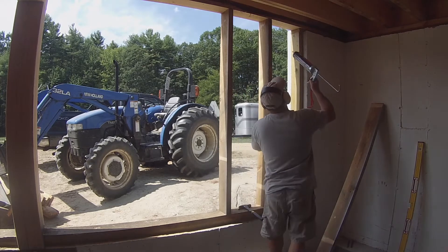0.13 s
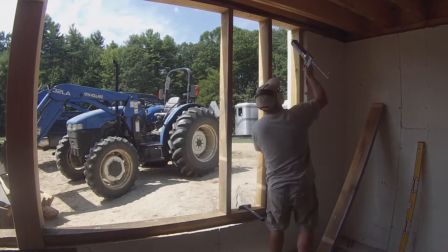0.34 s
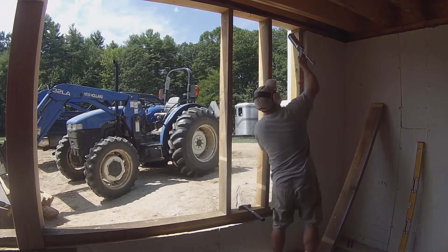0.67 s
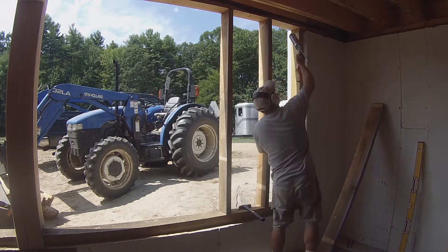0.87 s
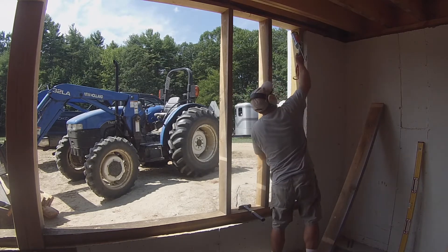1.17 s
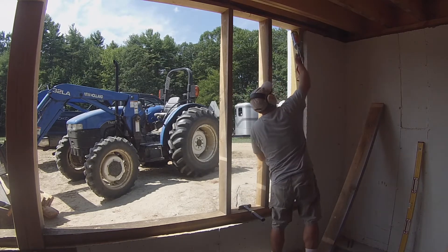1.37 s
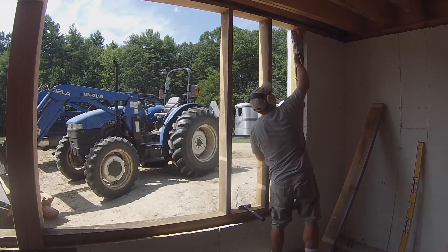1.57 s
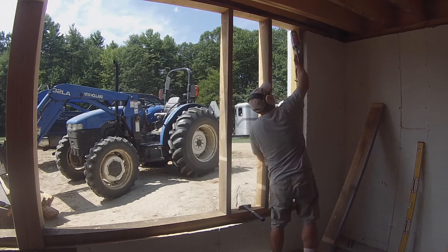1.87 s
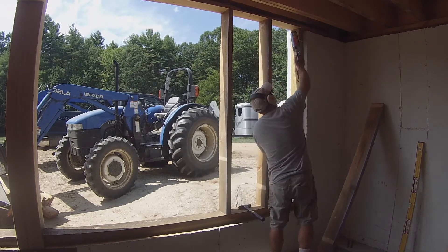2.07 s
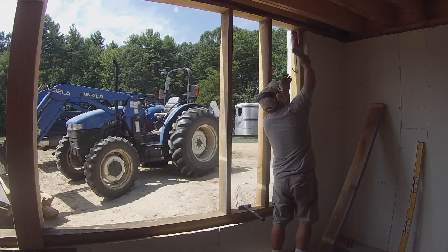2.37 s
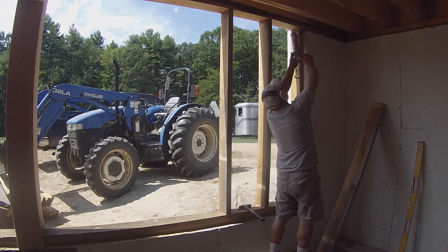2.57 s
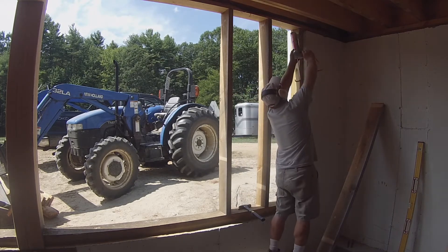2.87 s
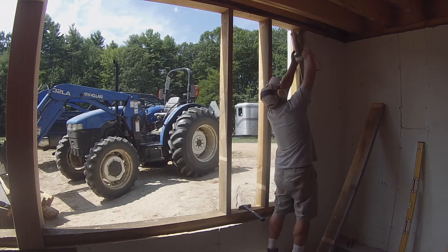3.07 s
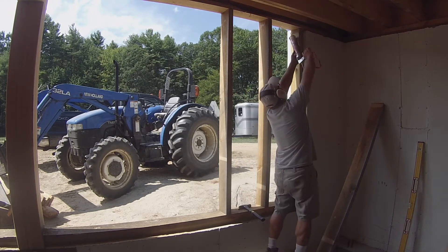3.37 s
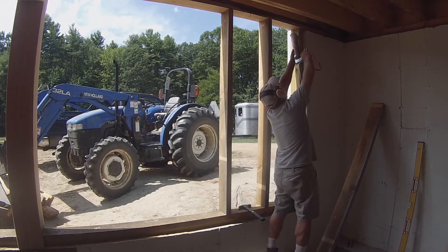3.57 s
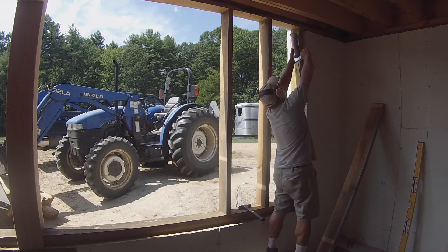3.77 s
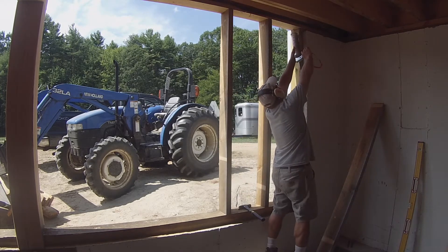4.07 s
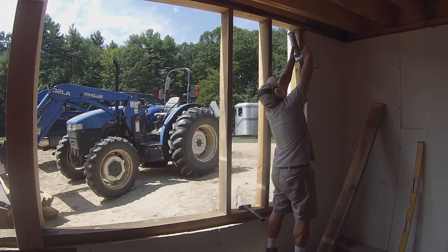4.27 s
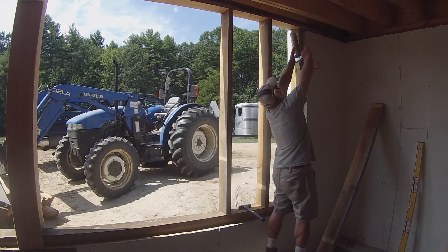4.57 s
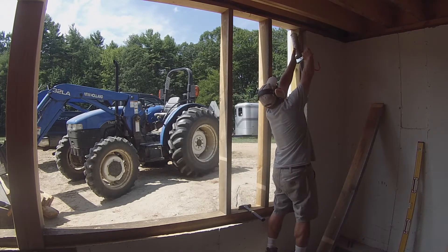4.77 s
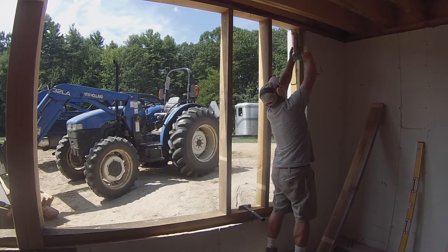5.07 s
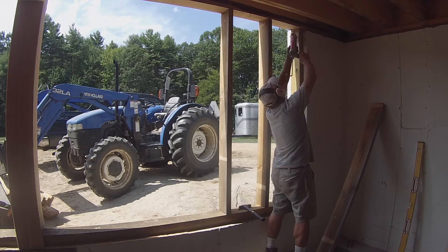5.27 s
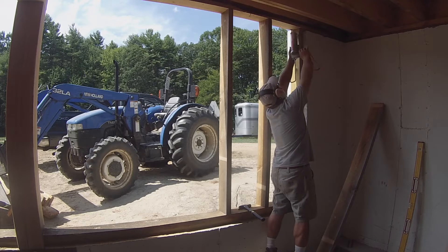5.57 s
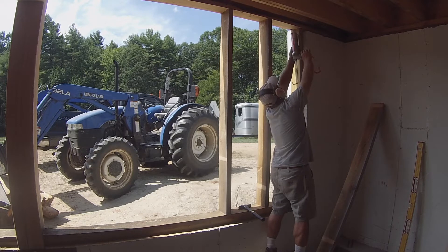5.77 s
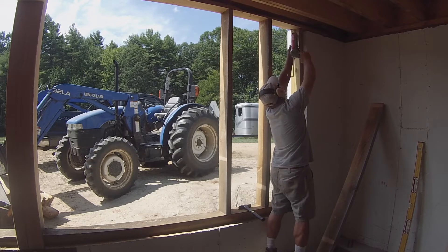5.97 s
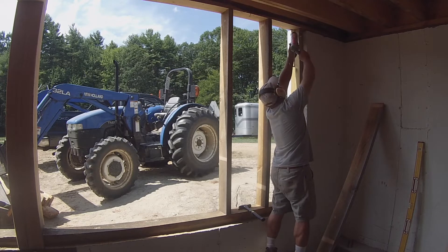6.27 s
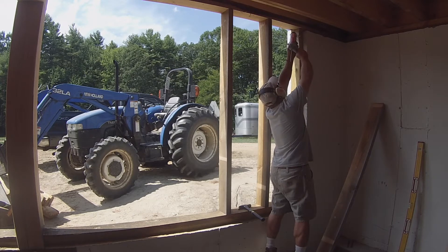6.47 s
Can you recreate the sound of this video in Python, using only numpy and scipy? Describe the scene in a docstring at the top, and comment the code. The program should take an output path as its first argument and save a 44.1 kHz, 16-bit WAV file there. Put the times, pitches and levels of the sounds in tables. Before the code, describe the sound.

The first 0.6 s is fully silent. Then quiet outdoor air enters abruptly, soft hiss and low rumble, with faint high ticks scattered to the end. At 0.87-0.97 s a tight burst of heavy, dull, hollow timber knocks is the loudest event, its hum dying after 1.1 s; a lighter knock follows at 1.44. A crisp steel caulking-gun click snaps at 1.98 s. Faint wood creaks appear around 2.4 and 2.9-3.05 s, with a brief fluttering cloth rub near 2.9-3.1 and small contacts at 3.4 and 3.7. Strong trigger clicks return at 3.92, 4.92 and 5.64 s, bright and metallic with a hollow tube ring beneath; dull knocks fall at 4.16, 5.06 and 6.14. Air alone remains to about 6.6 s. Contacts sound close to one microphone, each followed by a short wash from bare block walls.

```python
"""After a short silence, outdoor air rumbles and hisses through the open wall of a bare house shell, with
faint high ticks. Close by, a steel caulking gun clicks as its trigger is pumped, its tube ringing hollow
under the loud clicks; timber knocks and creaks and cloth rubs. Contacts ring resonant modes, and block
walls turn each into a short wash; creaks are unsteady tones in the same kind of wash; air, cloth, ticks
and the heavy knock's dying tail are shaped noise. All reach one microphone."""
import sys
import numpy as np
from scipy import signal
from scipy.fft import rfft, irfft, next_fast_len
from scipy.io import wavfile
from scipy.ndimage import uniform_filter1d, map_coordinates

SR = 44100
rng = np.random.default_rng(int(sys.argv[2]) if len(sys.argv) > 2 else 0)


def bounce(signal):
    """Save signal as a 16-bit WAV file at the path given by the first command-line argument."""
    frames = np.transpose(np.atleast_2d(signal))
    limited = np.clip(frames, -1, 1)
    pcm = np.round(limited * 32767).astype(np.int16)
    wavfile.write(sys.argv[1], SR, pcm)


N = 292383
TAIL = 2 ** 16  # length of a room answer [samples]


def amp(db):
    """Gain of a level in dB."""
    return 10 ** (np.asarray(db) / 20)


def unit(x):
    """x scaled to rms 1."""
    return x / np.sqrt(np.mean(x ** 2) + 1e-20)


def along(points, hz):
    """Points of (frequency [Hz], value) read on a log frequency axis."""
    point_hz, value = np.transpose(points)
    return np.interp(np.log(hz + 1), np.log(point_hz + 1), value)


def curves(rows):
    """One value per sample for each column after the time [s]."""
    s, *columns = np.transpose(rows)
    return [np.interp(np.arange(N) / SR, s, column) for column in columns]


def wobble(rate):
    """A smooth random curve through `rate` random knots a second."""
    knots = rng.standard_normal(int(N * rate / SR) + 4)
    return map_coordinates(knots, [np.arange(N) * rate / SR])


def filtered(x, response):
    """x with its spectrum multiplied by a response of frequency."""
    m = next_fast_len(len(x) + 8192)
    spectrum = rfft(x, m) * response(np.fft.rfftfreq(m, 1 / SR))
    return irfft(spectrum, m)[:len(x)]


def noise(spectrum):
    """Coloured noise of rms 1, all but silent below the first point of its spectrum."""
    def response(hz):
        return amp(np.where(hz > spectrum[0][0], along(spectrum, hz), -120))
    return unit(filtered(rng.standard_normal(N), response))


def walls(direct_db, rise):
    """Block walls: the direct path, then a wash that builds up over `rise` [s] and dies band by band."""
    # decay of the wash: (frequency [Hz], t60 [s])
    decay = [(100, 1.47), (500, 0.87), (1000, 0.72), (2300, 0.74), (4000, 0.61), (9000, 0.48),
             (14000, 0.28)]
    # extra strength of the first echoes: (frequency [Hz], level [dB])
    near_boost = [(150, 9), (700, 5), (1400, 8), (2500, -2), (10000, 0.5)]
    near_t60 = 0.14  # s
    hz, t, z = signal.stft(rng.standard_normal(TAIL), SR, nperseg=256)
    late = amp(-60 * t / along(decay, hz)[:, None])
    near = 1 + np.outer(amp(along(near_boost, hz)) - 1, amp(-60 * t / near_t60))
    # the first echoes arrive in bunches; later they merge into an even wash
    lumps = unit(uniform_filter1d(rng.standard_normal(len(t)), size=3))
    bunches = amp(3.0 * lumps * np.exp(-t / 0.048))
    wash = signal.istft(z * late * near * bunches, SR, nperseg=256)[1][:TAIL]
    wash = wash * (1 - np.exp(-np.arange(TAIL) / SR / max(rise, 1 / SR)))
    return np.concatenate([[amp(direct_db)], wash[1:]])


def blows(events, modes, contact_hz, rise, middle_hz, favour_octaves, scatter_db):
    """Contacts ring shared modes, tilted by sharpness and changed near the frequencies each one names."""
    out = np.zeros(N + TAIL)
    f = np.fft.rfftfreq(TAIL, 1 / SR)
    hz, usual_db, _ = np.transpose(modes)
    # two coupled resonances per mode give steep flanks; the root evens out energy over widths
    ring = np.array([(1j * f * w / (c * c - f * f + 1j * f * w)) ** 2 * np.sqrt(2 * SR / (np.pi * w))
                     for c, _, w in modes])
    # a soft contact drives little treble
    soft = 1 / (1 - (f / contact_hz) ** 2 + 1j * np.sqrt(2) * f / contact_hz)
    for s, db, direct_db, sharp_db, *places in events:
        place_db = 0
        for at_hz, change_db in zip(places[::2], places[1::2]):
            place_db = place_db + change_db * np.exp(-(np.log2(hz / at_hz) / favour_octaves) ** 2)
        tilt_db = sharp_db * np.log2(hz / middle_hz)
        strength_db = usual_db + tilt_db + place_db + scatter_db * rng.standard_normal(len(hz))
        heard = (amp(strength_db) @ ring) * soft * rfft(walls(direct_db, rise))
        out[round(s * SR):][:TAIL] += amp(db) * irfft(heard, TAIL)
    return out[:N]


def air_and_knock_tail():
    """Noise as hiss and low rumble of outdoor air, and a hollow hum, mostly the heavy knock's dying tail."""
    # spectra of hiss, hollow hum and rumble: (frequency [Hz], relative level [dB per Hz])
    hiss_spectrum = [(15, -36), (25, -3), (71, -3.5), (119, -6), (159, -10), (182, -6), (208, -6),
                     (479, -13), (736, -15.5), (1230, -18), (1330, -18.5), (3060, -21.5), (7020, -29.5),
                     (11100, -35), (15300, -40.5)]
    hum_spectrum = [(250, -41), (380, -3), (700, -0.5), (920, -9.5), (1050, -35)]
    rumble_spectrum = [(15, -5), (30, -11.5), (65, -6), (150, -4.5), (300, -40)]
    # low rumble of outdoor air, and a hollow hum that is mostly the heavy knock's dying tail around 1.06 s:
    # (time [s], rumble before wavering [dB], hum before wavering [dB])
    slow_levels = [(0.7, -77, -94), (0.78, -69, -70), (0.91, -60, -98), (1.06, -65, -43), (1.69, -70, -66),
                   (2.38, -67, -72), (2.55, -65.5, -64), (3.46, -68, -67), (4.08, -63, -63.5),
                   (4.28, -67, -69), (4.88, -69.5, -70.5), (5.23, -64, -67.5), (5.97, -67, -69),
                   (6.33, -67, -68.5), (6.63, -68, -75)]
    rumble_db, hum_db = curves(slow_levels)
    hiss = amp(-60 + 0.6 * wobble(3)) * noise(hiss_spectrum)
    rumble = amp(rumble_db + 0.6 * wobble(6)) * noise(rumble_spectrum)
    hum = amp(hum_db + 0.52 * wobble(8.8)) * noise(hum_spectrum + [(1300, -120)])
    return hiss + rumble + hum


def ticks():
    """Treble noise opened in puffs of a few milliseconds; the weak ones fall at random and waver in level."""
    # the clearest faint high ticks: (time [s], level [dB])
    clear_ticks = [(0.825, -70), (1.1804, -68), (1.2645, -71), (1.4576, -67), (2.363, -71), (2.428, -68),
                   (2.8274, -72), (3.1403, -74), (4.1624, -70), (4.2627, -70), (4.7321, -66.5),
                   (4.8344, -70), (5.4834, -71), (6.2654, -72), (6.3684, -73)]
    # colour of a tick: (frequency [Hz], relative level [dB per Hz])
    tick_spectrum = [(6500, -20), (8500, 0), (9800, 1), (10400, 8), (11300, 9), (11800, -2), (13500, -6),
                     (15000, -20)]
    weak_count, weak_db, spread_db = 160, -82, 1.5  # level before wavering, scatter
    gate = np.zeros(N)
    weak_gain = amp(weak_db + spread_db * rng.standard_normal(weak_count))
    gate[rng.integers(N, size=weak_count)] = weak_gain
    gate = gate * amp(2.2 * wobble(8))
    for s, db in clear_ticks:
        gate[round(s * SR)] = amp(db)
    puff = np.exp(-(np.arange(-600, 601) / SR / 0.004) ** 2)
    return signal.fftconvolve(gate, puff, "same") * noise(tick_spectrum)


def rustle():
    """Cloth and hands rub on the frame: fluttering noise, only while the arms move."""
    # rubbing: (time [s], level before flutter [dB])
    rubbing = [(2.3, -77), (2.384, -78), (2.778, -79), (2.89, -67), (2.898, -61), (3.036, -61.5),
               (3.088, -71), (3.156, -68), (3.3, -89), (3.35, -66)]
    # colour of the cloth: (frequency [Hz], relative level [dB per Hz])
    cloth_spectrum = [(530, -22.5), (900, 0), (1030, -5), (1470, -13), (1780, -2), (2930, -6), (12000, -28),
                      (15600, -60), (22000, -120)]
    start, end = rubbing[0][0], rubbing[-1][0]
    moving = np.interp(np.arange(N) / SR, [start - 0.1, start, end, end + 0.11], [0, 1, 1, 0])
    return moving * amp(curves(rubbing)[0] + 1.1 * wobble(67)) * noise(cloth_spectrum)


def creaks():
    """Strained wood sings narrow tones, unsteady in pitch and level, among the walls."""
    # faint creaks: (start [s], length [s], mean pitch [Hz], level before wavering [dB])
    creak_rows = [(2.359, 0.1, 440, -61), (2.396, 0.23, 807, -64), (2.92, 0.062, 1010, -64.5),
                  (2.925, 0.135, 831, -62.5), (2.98, 0.055, 651, -61)]
    t, out = np.arange(N) / SR, np.zeros(N)
    for s, length, hz, db in creak_rows:
        swell = np.clip(np.minimum(t - s, s + length - t) / 0.014, 0, 1)
        level = amp(db + 3.2 * wobble(29.88))
        phase = 2 * np.pi * hz * np.cumsum(1 + 0.01546 * wobble(25)) / SR
        out += level * swell * np.sin(phase)
    room = walls(46.0, rise=0.01)
    return signal.fftconvolve(out, room / np.linalg.norm(room))[:N]


def timber_and_tube():
    """Low modes: dull knocks of studs and boards, and the gun's tube near 690 Hz under the loud clicks."""
    # studs, boards and the gun's tube: (frequency [Hz], usual strength [dB], width [Hz])
    low_modes = [(70, -25, 87), (144, -14.5, 87), (259, -13.5, 67), (367.4, -9, 92), (463, -6, 90),
                 (594, -4.5, 81), (693, -8.5, 104), (805, -9.5, 54), (890, -10, 40), (1085, -19, 90),
                 (1360, -25.5, 82)]
    # dull knocks of studs and boards, and the hollow ring of the gun's tube under the loud clicks:
    # (time [s], relative level [dB], direct path gain against the wash [dB],
    # sharpness [dB per octave], then pairs of modes favoured or damped: frequency [Hz], change [dB])
    knocks = [(0.63, -59.5, 21, -2.5, 700, 1.8, 70, -12), (0.868, -44.5, 26, -3, 590, 7, 805, -14),
              (0.888, -34.5, 30.5, -1.5, 706, 5.3, 465, 2.5), (0.914, -41, 25, 3, 400, 6, 895, 3),
              (0.947, -26.5, 28.5, 0.3, 900, 4.2, 700, -7, 400, 4),
              (0.965, -29, 30.7, 1, 810, 3, 410, 9, 200, -8), (1.069, -46, 32.5, 0, 594, 12.6, 255, -14),
              (1.129, -47, 26, 3, 500, 16, 695, -12), (1.439, -51, 28.8, 6.5, 740, 8.2, 370, -6),
              (1.992, -70.5, 36.72, -0.5, 707, 19.3, 465, 2), (3.347, -72, 22.22, 4, 594, 5, 255, -8),
              (3.393, -64.5, 31.32, 4, 614, 4.4, 252, -12), (3.686, -63.5, 34.56, 4, 835, 10.2, 594, 4),
              (3.843, -63, 31, 5, 740, 15, 465, -10), (3.921, -67, 31.48, 12, 648, 18, 805, 3),
              (4.115, -65.5, 28.08, 6, 695, 11.3, 895, 2.5), (4.156, -63.5, 37, -4.5, 614, 12, 805, -12),
              (4.93, -69, 31.48, 12, 695, 16, 594, 4), (5.063, -50, 38, -2, 740, 9.9, 367, 4, 500, -5),
              (5.641, -62, 36.72, 5, 700, 15, 594, 3.5), (6.1385, -55, 35.7, -3, 370, 5.3, 255, 4),
              (6.283, -79, 36.72, 3, 695, 17, 465, -1)]
    return blows(knocks, low_modes, contact_hz=1240, rise=0.0037, middle_hz=594,
                 favour_octaves=0.13, scatter_db=1.5)


def gun():
    """Catch and trigger contacts ring the bright modes of the steel gun."""
    # frame, rod and catch: (frequency [Hz], usual strength [dB], width [Hz])
    steel_modes = [(671, -20, 110), (1850, -16, 155), (2287, -9, 397), (2800, -13.5, 195), (3270, -12, 270),
                   (3545, -11.5, 177), (3824, -10.5, 256), (4420, -12, 380), (4710, -17, 130),
                   (5280, -13, 175), (5786, -11, 210), (6124, -7.5, 480), (7230, -12, 780),
                   (7880, -12.5, 730), (9500, -11, 1300), (11130, -11, 900), (12500, -12, 2300),
                   (14400, -29, 1500)]
    # clicks: (time [s], relative level [dB], direct path gain against the wash [dB],
    # sharpness [dB per octave], then pairs: frequency [Hz], change [dB] of
    # modes that the place of the blow and the grip favour or damp)
    clicks = [(0.603, -60, 24, -7, 2300, 3, 3560, -2), (0.888, -54.5, 24, -8, 3050, 8, 690, -15),
              (0.955, -67, 29, -5, 2260, 11, 690, -16), (1.4225, -68, 28, -8, 5200, 12, 700, -13),
              (1.437, -56, 26, -5, 3100, 3, 687, -17), (1.9825, -40.5, 12, 1.2, 3650, 3, 4380, 5, 9550, 5),
              (1.987, -48, 15, 5, 6150, 6, 9550, 4), (3.1585, -66.5, 21, 0.5, 7000, 10, 3620, -12),
              (3.382, -60, 19, -8.5, 2200, 11, 695, -15), (3.4015, -64, 21, 0.5, 5930, 14, 2260, -12),
              (3.688, -61, 24, -6, 5750, 8, 3850, -10), (3.856, -68, 21, -4, 2260, 4, 690, -17),
              (3.876, -62.5, 16, -3.5, 2260, 6, 690, -12),
              (3.9195, -37, 23, -1.6, 3280, 8, 2300, 4, 1870, -4), (3.9545, -59, 24, 7, 7600, 17, 2260, 3),
              (4.1565, -57.5, 27, -9.5, 3220, 7.5, 690, -16),
              (4.924, -39, 16.5, 4.5, 4780, 13, 3350, -13, 1870, 8, 10300, 7),
              (5.64, -38.5, 19, -1.2, 2260, 5, 3820, 4.5, 8800, -6),
              (5.7105, -56, 29, 2, 2260, 12, 6200, 5), (6.139, -67, 26, -9.5, 1870, 3, 706, -9)]
    return blows(clicks, steel_modes, contact_hz=17800, rise=0.0024, middle_hz=4030,
                 favour_octaves=0.068, scatter_db=1.5)


def scene():
    """Gun, timber, cloth and outdoors at one microphone."""
    return (gun() + timber_and_tube() + creaks() + rustle() + ticks() + air_and_knock_tail())[None]


def record(dry):
    """Sound fades in quickly after silence, and nothing passes above the band limit."""
    start_s, top_hz = 0.595, 15330
    fade = np.clip((np.arange(N) / SR - start_s) / 0.004, 0, 1)
    limited = filtered(dry[0] * fade, lambda hz: hz < top_hz)
    return limited[None] * (fade > 0)  # keeps the opening fully silent


dry = scene()
out = record(dry)
bounce(out)
```